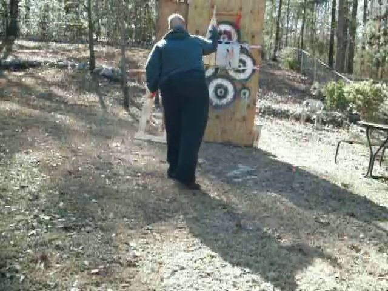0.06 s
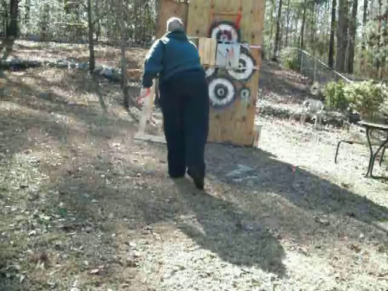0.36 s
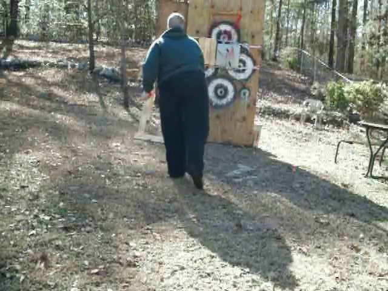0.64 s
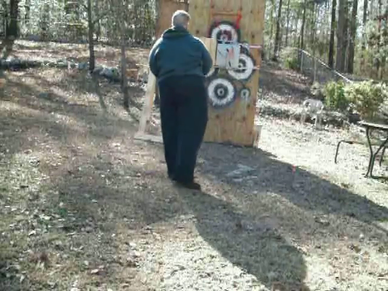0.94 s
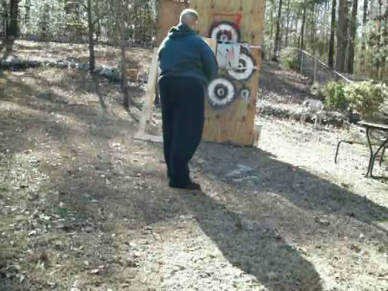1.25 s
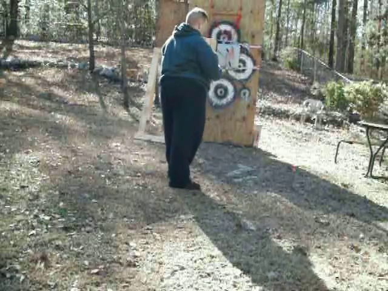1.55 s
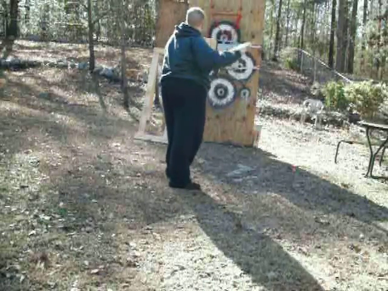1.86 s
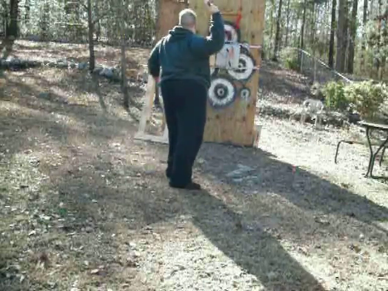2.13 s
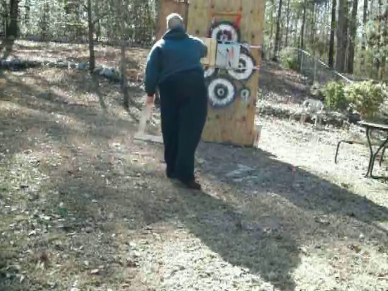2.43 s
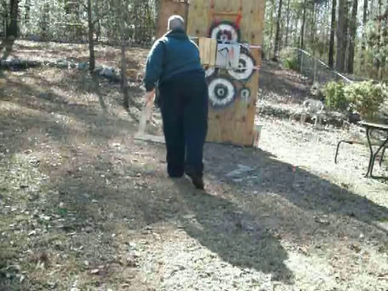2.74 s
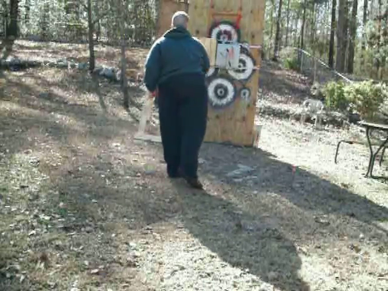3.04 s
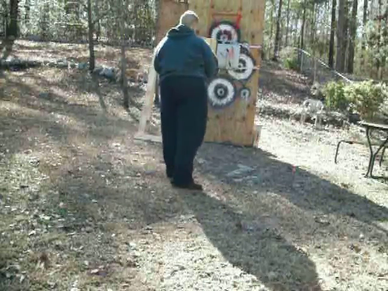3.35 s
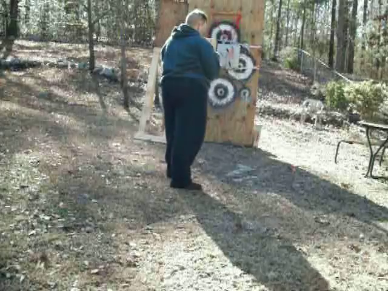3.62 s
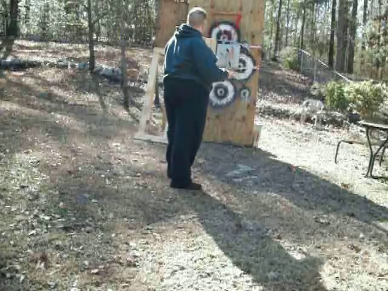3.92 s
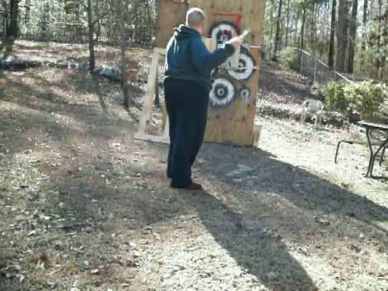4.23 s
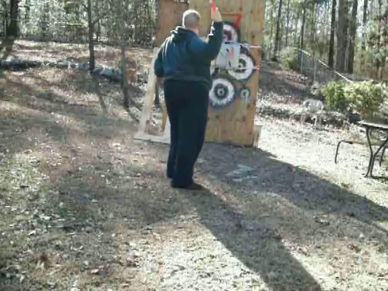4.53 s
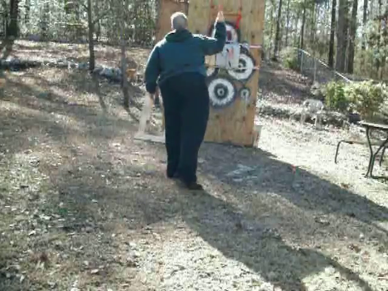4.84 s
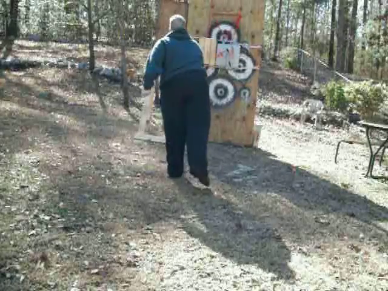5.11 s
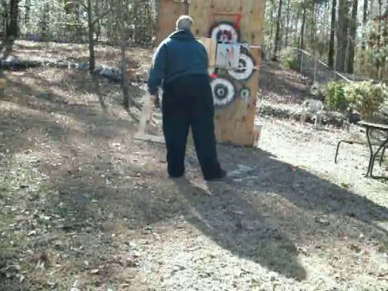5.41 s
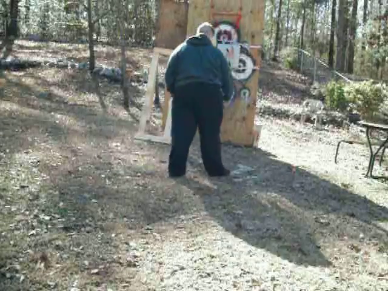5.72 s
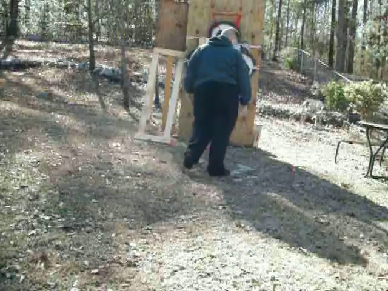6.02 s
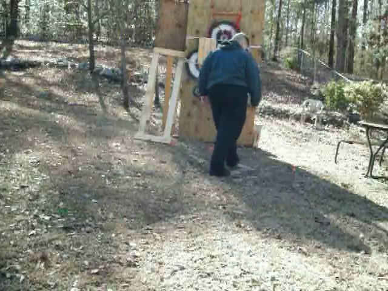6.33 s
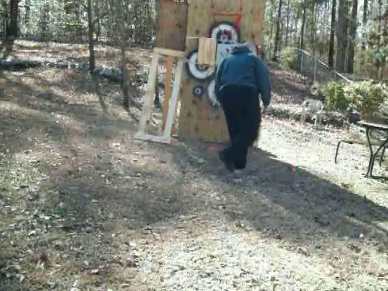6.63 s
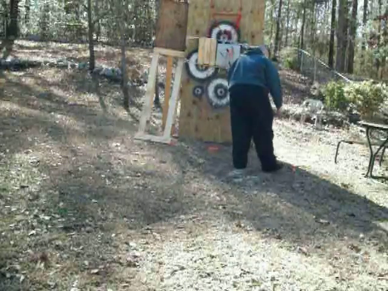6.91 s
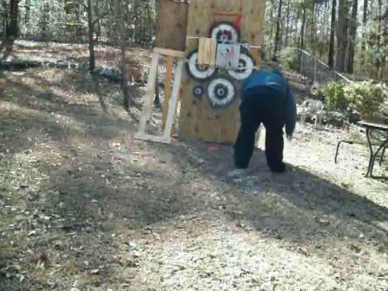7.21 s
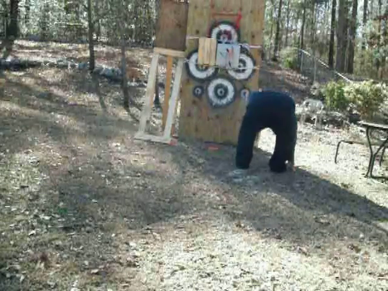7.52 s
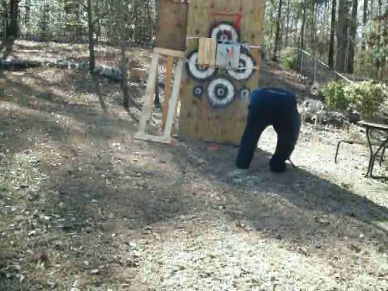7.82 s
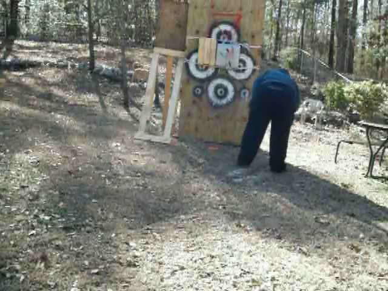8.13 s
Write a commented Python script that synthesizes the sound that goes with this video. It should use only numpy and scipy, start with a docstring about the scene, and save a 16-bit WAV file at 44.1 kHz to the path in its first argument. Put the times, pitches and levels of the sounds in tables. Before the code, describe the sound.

Trees hiss softly and steadily in an outdoor yard over a distant low rumble. At about 0.3 seconds a thrown knife hits a plywood target with a loud, sharp crack and a wooden knock, briefly shaking the board. After a tiny leaf crunch, a second knife strikes at 2.7 seconds with a quick double slap and a buzzing wooden rattle. It clinks at 2.8 seconds, rings briefly as it spins, and lands at 3.4 with a gritty snap and thud. A third knife hits with another double crack at 5.1 seconds and drops onto the soil at 5.8. From 6 seconds, faint footsteps crunch over dry leaves. From about 7.8 seconds to the end, just past 8, low puffs of wind buffet the microphone. There is very little echo, and the highest treble is missing.

```python
"""In a wooded yard, three knives are thrown at a plywood target. Each cracks the wood and shakes the board.
The first sticks; the others bite, slap the board and drop, one clinking as it spins away. The thrower
crunches over dry leaves to fetch them. The trees hiss, something rumbles far off, and a gust buffets
the microphone of a camera that misses the highest sounds."""
import sys
import numpy as np
from scipy import signal
from scipy.fft import rfft, irfft, next_fast_len
from scipy.io import wavfile
from scipy.ndimage import uniform_filter1d

SR = 44100
rng = np.random.default_rng(int(sys.argv[2]) if len(sys.argv) > 2 else 0)


def digitize_waveform(pressure):
    """Quantize a signal to 16-bit integers and store it at the path in sys.argv[1].

    Rows of a 2-D input are taken as channels; values are limited to [-1, 1].
    """
    field = np.atleast_2d(pressure).T
    bounded = np.clip(field, -1, 1)
    quanta = np.round(bounded * 32767).astype(np.int16)
    wavfile.write(sys.argv[1], SR, quanta)


N = 368676
TIME = np.arange(N) / SR

# Tones of the flexing board: (pitch [Hz], level [dB], fade [s]). A fade is the time to drop by 60 dB.
BOARD_TONES = [(39.8, -0.5, 0.67), (117.4, -7, 0.31), (146.8, 0.5, 0.31), (193, -11, 0.16),
               (350, -8.5, 0.14), (422, 3, 0.13), (652, -2.5, .12), (660, -14, 0.3)]
# Tones of the stand that holds it: (pitch [Hz], level [dB], fade [s])
STAND_TONES = [(184.6, 1, .36), (386, -3, 0.31), (804, -4, 0.22), (990, -20.5, .18), (1640, -23, 0.24),
               (1696, -14.5, 0.19), (1980, -29, .25)]
# The bright noise of a sharp crack: (pitch [Hz], level [dB])
CRACK_COLOUR = [(500, -22.5), (1500, -20), (2600, 0), (3700, -5), (5050, 6), (5800, -4)]
# The noise of grit and dry leaves: (pitch [Hz], level [dB])
GRIT_COLOUR = [(800, -25.5), (2500, -10), (3800, -3.5), (5000, -0.5), (6000, -10)]


def knife_hits(even_bite_s=0.0018, stop_db_per_doubling=4.5):
    """The point cracks and pushes the wood; a second push as it stops rings the board and stand."""
    # Knife blows: (time [s], bite length [s], time to stop [s], crack [dB], splinter [dB],
    # splinter pitch [Hz], knock [dB], knock pitch [Hz], thump [dB], board [dB])
    hits = [(0.3384, 0.00098, 0.00454, -15, -12.5, 1890, -10, 527, -12, -24),
            (2.6577, 0.0026, 0.00389, -12.5, -13, 1100, -12, 720, -26.5, -25),
            (2.6760, .0008, .0018, -30, -8, 2190, -13, 1170, -7.5, -23.5),
            (5.148, 0.00084, 0.0039, -12.5, -11.5, 1300, -15, 826, -26, -26),
            (5.1679, 0.0023, 0.00488, -9, -11.5, 1100, -11.5, 780, -22, -37.5)]
    # Tones of the whole board being shoved back: (pitch [Hz], level [dB], fade [s])
    thump_tones = [(109, -4, 0.045), (198, -1, 0.053), (425, 1.5, 0.026)]
    wood, cracks = 0, 0
    for s, bite, stop, crack_db, splinter_db, splinter_hz, knock_db, knock_hz, thump_db, board_db in hits:
        cracks += burst(s, crack_db, bite, fade_s=0.017)
        wood += burst(s, splinter_db, bite, fade_s=0.022) * even_noise(splinter_colour(splinter_hz))
        spot = struck_spot(knock_hz)
        stop_db = stop_db_per_doubling * np.log2(bite / even_bite_s)   # a longer bite stops harder
        wood += ring(spot, s, knock_db) + ring(spot, s + stop, knock_db + stop_db)
        wood += ring(thump_tones, s + 0.36 * stop, thump_db)   # the heavy board gives way a bit later
        stand_db = 2 * thump_db - 10   # a harder shove rings the stand louder
        wood += ring(BOARD_TONES, s + stop, board_db) + ring(STAND_TONES, s + stop, stand_db)
    return wood + cracks * even_noise(CRACK_COLOUR)


def splinter_colour(hz, peak_db=7, width_octaves=0.08):
    """The colour of tearing wood, with a peak at a pitch set by the splinter's length."""
    # The noise of wood fibres tearing: (pitch [Hz], level [dB])
    tearing = [(200, -4.5), (600, -4.5), (1150, 2.5), (1650, -9), (2100, -4), (3000, -12.5), (4500, -19),
               (6000, -39)]
    tearing_hz, tearing_db = np.transpose(tearing)
    pitches = np.geomspace(150, 7000, num=60)
    peak = peak_db * np.exp(-.5 * (np.log2(pitches / hz) / width_octaves) ** 2)
    return np.c_[pitches, np.interp(np.log(pitches), np.log(tearing_hz), tearing_db) + peak]


def struck_spot(centre_hz, fall_db=9):
    """The spot that is hit favours tones near one pitch; those further away are weaker."""
    # Tones of the wood around the knife point: (pitch [Hz], level [dB], fade [s])
    knock_tones = [(425.4, 4, 0.037), (572, 3.5, 0.027), (702, 3.5, 0.019), (799, -5, 0.045),
                   (1087, -3, .022), (1160, -8, 0.016)]
    return [(hz, db - fall_db * np.log2(hz / centre_hz) ** 2, fade) for hz, db, fade in knock_tones]


def rebounds(bounce_s=0.0218, rattle_hz=185, rattle_depth=0.28, buzz_hz=1700):
    """The swinging board bumps its stand twice and rattles against it, touching once per shake."""
    # The swing after each throw: (time [s], low chatter [dB], buzz [dB], stand [dB], rattle fade [s])
    swings = [(0.3638, -17, -55, -40, .12), (2.7083, -19, -25, -20, 0.41), (5.1978, -22, -32.5, -44, 0.051)]
    # The low chatter of board on stand: (pitch [Hz], level [dB])
    chatter_colour = [(60, -12), (130, 5.5), (230, -5), (400, -6), (620, -22.5), (900, -29), (1500, -35),
                      (4000, -49.5)]
    chatter, buzz, tones = 0, 0, 0
    for start, chatter_db, buzz_db, stand_db, rattle_fade in swings:
        first_bump = (start, 0, 0, 0.09)
        softer_bump = (start + bounce_s, 7, 10.5, rattle_fade)
        for s, loss_db, buzz_loss_db, fade in first_bump, softer_bump:
            chatter += burst(s, chatter_db - loss_db, rise_s=0.0074, fade_s=fade)
            buzz += burst(s, buzz_db - buzz_loss_db, rise_s=0.0012, fade_s=fade)
            tones += ring(BOARD_TONES, s, chatter_db - loss_db - 17)   # the board flexes only a little
            tones += ring(STAND_TONES, s, stand_db - loss_db)
    buzz *= 1 + rattle_depth * np.sin(2 * np.pi * rattle_hz * TIME)
    return tones + chatter * even_noise(chatter_colour) + buzz * even_noise(splinter_colour(buzz_hz))


def landings(rise_s=0.00038, settle_s=0.00684, twig_hz=1950):
    """A falling knife scatters grit, snaps twigs and thuds on the soil, then settles more softly."""
    # A dropped knife grazes or lands on the ground: (time [s], grit [dB], twigs [dB], thud [dB], fade [s])
    contacts = [(2.809, -44, -25, -51, 0.026), (3.4115, -15, -12.5, -16, 0.012),
                (5.7811, -19.5, -47, -19.5, 0.01)]
    # Tones of packed soil: (pitch [Hz], level [dB], fade [s])
    soil_tones = [(102.3, -1, .055), (266, -3, 0.022), (415, -3, 0.022)]
    grit, twigs, thud = 0, 0, 0
    for s, grit_db, twig_db, thud_db, fade in contacts:
        grit += burst(s, grit_db, rise_s, fade) + burst(s + settle_s, grit_db - 13.5, rise_s, 0.065)
        twigs += burst(s, twig_db, rise_s, fade)
        thud += ring(soil_tones, s, thud_db) + ring(soil_tones, s + settle_s, thud_db - 7)
    twig_colour = splinter_colour(twig_hz, peak_db=9.5)
    return grit * even_noise(GRIT_COLOUR) + twigs * even_noise(twig_colour) + thud


def spinning_blade(start_s=2.8269, clink_db=-11, bending_hz=3176, turns_per_s=7.3):
    """Steel hits something hard and rings, swelling whenever its flat side turns to the microphone."""
    # Tones of the steel blade: (pitch [Hz], level [dB], fade [s])
    blade_tones = [(1226, -10, 0.037), (2590, -10.5, 0.03), (2790, -27, 0.29), (3530, -17.5, 0.12),
                   (4310, -4, 0.031), (5520, -10, 0.077), (5470, -16.5, 0.06)]
    touches = (start_s, clink_db), (start_s + 0.0041, clink_db - 15.5)
    ticks = sum(burst(s, db - 2, rise_s=0.00037, fade_s=0.052) for s, db in touches)
    loud_ring = burst(start_s, db=-16.5, rise_s=0.033, fade_s=0.21)
    faint_ring = burst(start_s, db=-44, rise_s=0.033, fade_s=2)
    angle = 2 * np.pi * turns_per_s * (TIME - start_s) - 0.1
    facing = 0.7 + 0.3 * np.sin(angle) ** 2
    bending_tone = facing * (loud_ring + faint_ring) * np.sin(2 * np.pi * bending_hz * TIME)
    return ticks * even_noise(CRACK_COLOUR) + ring(blade_tones, start_s, clink_db) + bending_tone


def footsteps(crackle_spread_db=4):
    """Each step crushes leaves in a clump of tiny crackles."""
    # Shoes on dry leaves: (time [s], level [dB], half length [s])
    steps = [(2.455, -33.5, 0.0045), (6.013, -46.5, 0.077), (6.57, -42, 0.041), (6.685, -38.5, 0.016),
             (7.323, -42.5, 0.067), (7.627, -43, 0.021), (7.857, -41, 0.022), (8.26, -44, 0.08)]
    moments = TIME[::100]
    crackles = from_db(crackle_spread_db * np.interp(TIME, moments, rng.standard_normal(len(moments))))
    return swells(steps) * crackles / crackles.mean() * noise(GRIT_COLOUR)


def gust(swirl_hz=150, swirl_octaves=0.53, swirl_gain_db=10, swirl_growth=2.23):
    """Puffs of air buffet the microphone; the strongest shed small swirls that flutter higher."""
    # Puffs of wind: (peak time [s], level [dB], half length [s])
    puffs = [(7.835, -15, 0.036), (7.95, -21.5, 0.037), (8.089, -15, .045), (8.332, -28, 0.077)]
    # The deep noise of air on the microphone: (pitch [Hz], level [dB])
    wind_colour = [(15, -9.5), (40, 2.5), (90, -1.5), (160, -11.5), (250, -24), (400, -35.5), (900, -59),
                   (3000, -91)]
    flow = swells(puffs)
    pitches = np.geomspace(10, 7000, num=60)
    swirl_db = -13 * np.hypot(1, np.log2(pitches / swirl_hz) / swirl_octaves)   # one rounded peak
    swirls = even_noise(np.c_[pitches, swirl_db], samples=1800)
    buffeting = flow * even_noise(wind_colour, samples=1800)
    return buffeting + from_db(swirl_gain_db) * flow ** swirl_growth * swirls


def yard_echo(sound, echo_db=-27, fade_s=0.19, dull_hz=3500):
    """Trunks and ground add a thin, dull spray of echoes."""
    age = TIME[:SR]
    echoes = rng.standard_normal(SR) * (rng.random(SR) < .02)
    echoes *= from_db(-60 * age / fade_s) * (age > .008)   # none returns in the first 8 ms
    echoes = signal.sosfilt(signal.butter(1, dull_hz, fs=SR, output="sos"), echoes)
    return sound + from_db(echo_db) * signal.fftconvolve(sound, echoes / np.linalg.norm(echoes))[:N]


def outdoors(rumble_db=-34, hiss_db=-39.5):
    """Over a far rumble, the trees hiss steadily and a breeze sighs in their tops."""
    # Distant rumble: (pitch [Hz], level [dB])
    rumble_colour = [(10, -10.5), (22, -5.5), (40, 2.5), (60, -0.5), (95, -0.5), (140, -7.5), (185, -8),
                     (250, -16), (320, -24.5), (600, -51.5)]
    # Hissing trees: (pitch [Hz], level [dB])
    hiss_colour = [(150, -33.5), (250, 0), (342, -0.5), (374, -1.5), (426, 0.5), (582, -0.5), (699, 2),
                   (1030, -2.5), (1540, -5.5), (1930, -7.5), (2700, -9), (4430, -10), (5180, -13),
                   (5600, -20.5), (7280, -45), (12300, -120)]
    # Sighing treetops: (pitch [Hz], level [dB])
    sigh_colour = [(300, -31.5), (650, -8.5), (950, -1.5), (1200, -4.5), (2000, -26)]
    # The breeze dies down, then picks up a little: (time [s], level [dB])
    breeze = [(0, -44.5), (3.8, -47.5), (6.9, -59), (8.36, -51.5)]
    breeze_db = np.interp(TIME, *np.transpose(breeze))
    steady = from_db(rumble_db) * noise(rumble_colour) + from_db(hiss_db) * noise(hiss_colour)
    return steady + from_db(breeze_db) * noise(sigh_colour)


def from_db(db):
    """Turn decibels into a number to multiply a sound by."""
    return 10 ** (np.asarray(db) / 20)


def noise(colour):
    """Noise of strength 1; its colour says how loud each pitch is compared with the others."""
    hz, db = np.transpose(colour)
    size = next_fast_len(N)
    pitches = np.maximum(np.fft.rfftfreq(size, 1 / SR), 1)
    gains = from_db(np.interp(np.log(pitches), np.log(hz), db))
    sound = irfft(rfft(rng.standard_normal(size)) * gains, size)[:N]
    return sound / sound.std()


def even_noise(colour, samples=160):
    """Noise whose loudness is evened out over short stretches."""
    sound = noise(colour)
    return sound / np.sqrt(uniform_filter1d(sound * sound, size=samples) + 1e-9)


def burst(s, db, rise_s, fade_s):
    """A loudness curve that starts at time s, rises and dies away."""
    age = np.maximum(TIME - int(s * SR) / SR, 0)
    return np.minimum(age / rise_s, 1) * from_db(db - 60 * np.maximum(age - rise_s, 0) / fade_s)


def swells(rows):
    """A loudness curve with one smooth hump for each row."""
    return sum(from_db(db) * np.exp(-.5 * ((TIME - s) / half_length) ** 2) for s, db, half_length in rows)


def ring(tones, s, db):
    """Fading tones set off by one push at time s; neighbours start in opposite directions."""
    out, start = np.zeros(N), int(s * SR)
    age = TIME[:N - start]
    for k, (hz, tone_db, fade) in enumerate(tones):
        out[start:] += (-1) ** k * from_db(db + tone_db - 60 * age / fade) * np.sin(2 * np.pi * hz * age)
    return out


def scene():
    """Everything in the yard, at one microphone."""
    throws = knife_hits() + rebounds() + landings() + spinning_blade()
    return (yard_echo(throws + footsteps()) + outdoors() + gust())[None]


def record(dry, band_hz=5873, offset=-0.0228, ceiling=0.725, cutoff_hz=16000):
    """The camera cuts the high treble, sits slightly off zero and flattens the loudest peaks."""
    treble_cut = signal.firwin(201, band_hz, window=("kaiser", 7), fs=SR)
    narrow = signal.fftconvolve(dry, treble_cut[None], mode="same")
    clipped = np.clip(narrow + offset, -ceiling, ceiling)
    return signal.sosfilt(signal.cheby2(12, 70, cutoff_hz, fs=SR, output="sos"), clipped)


dry = scene()
out = record(dry)
digitize_waveform(out)
```